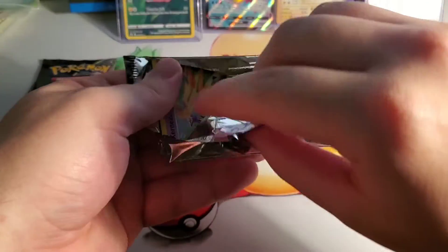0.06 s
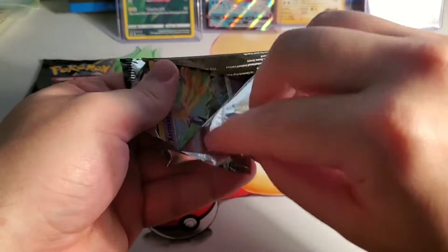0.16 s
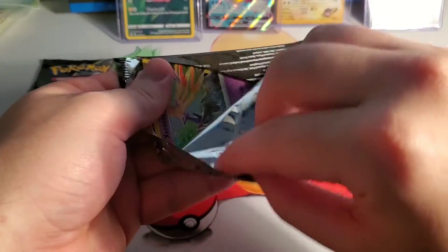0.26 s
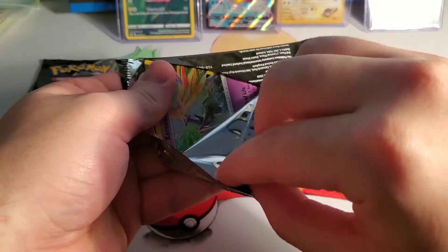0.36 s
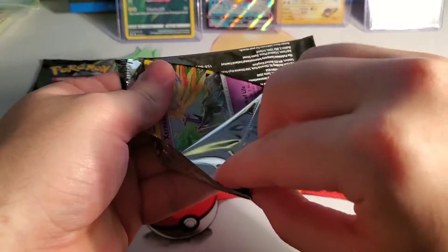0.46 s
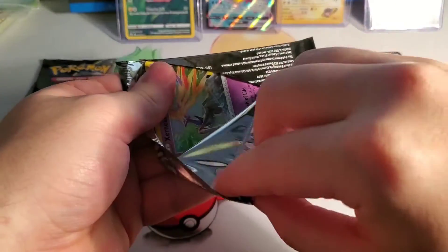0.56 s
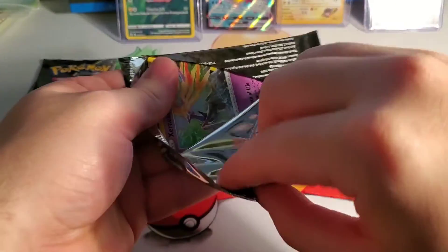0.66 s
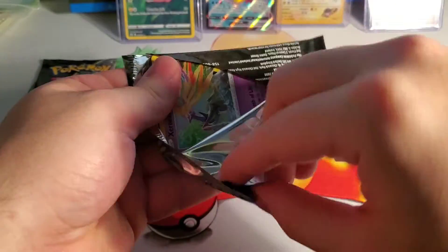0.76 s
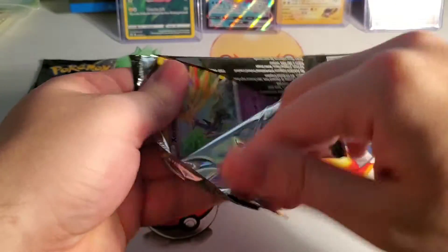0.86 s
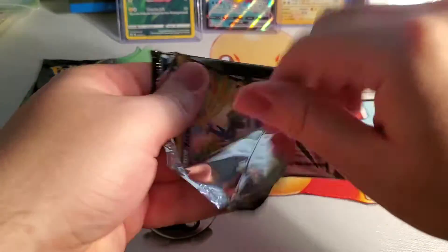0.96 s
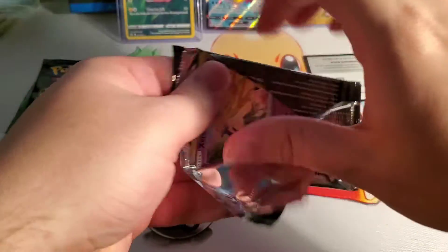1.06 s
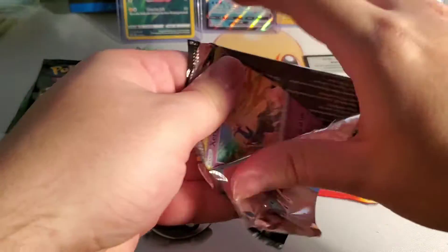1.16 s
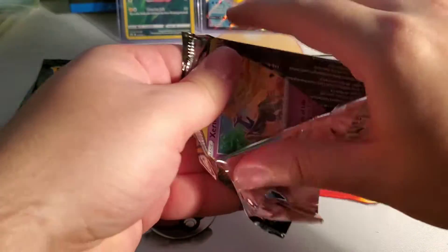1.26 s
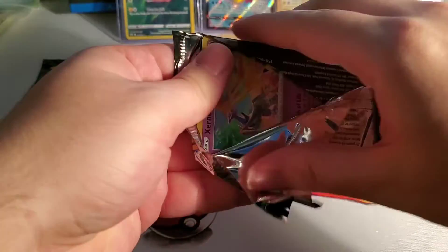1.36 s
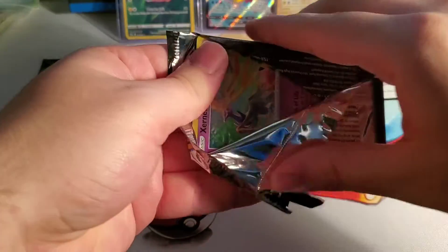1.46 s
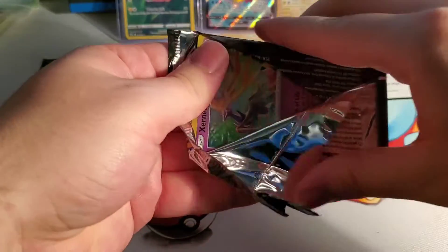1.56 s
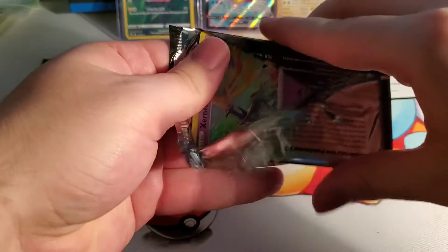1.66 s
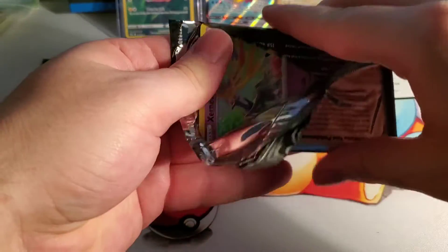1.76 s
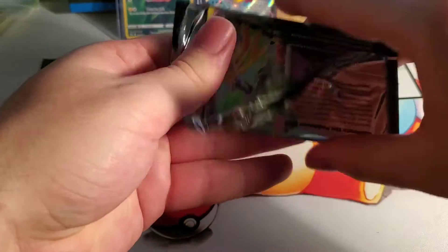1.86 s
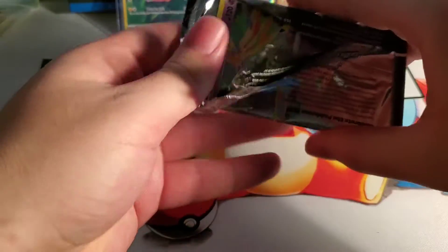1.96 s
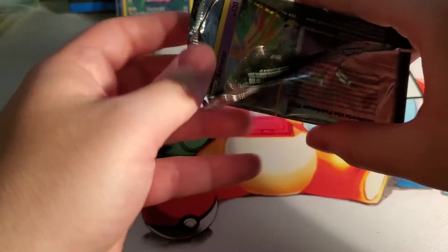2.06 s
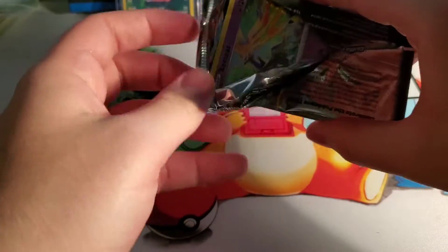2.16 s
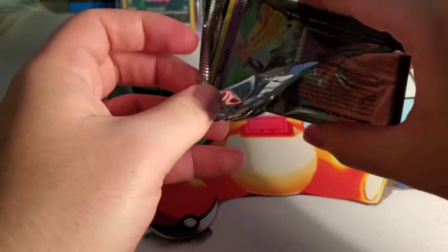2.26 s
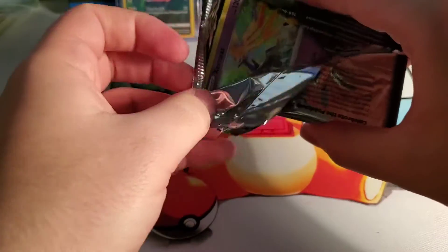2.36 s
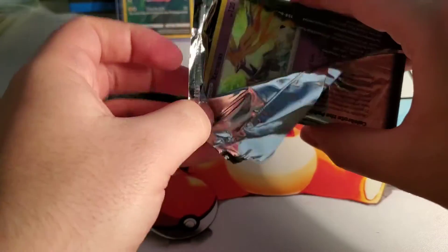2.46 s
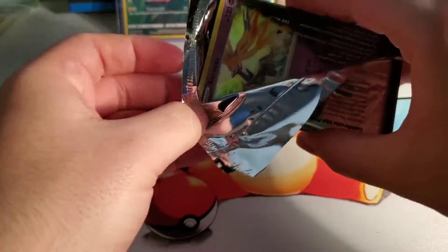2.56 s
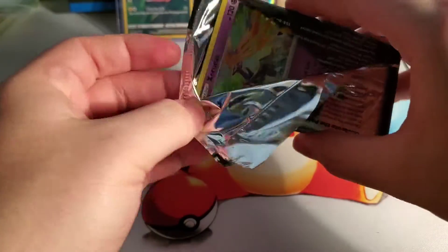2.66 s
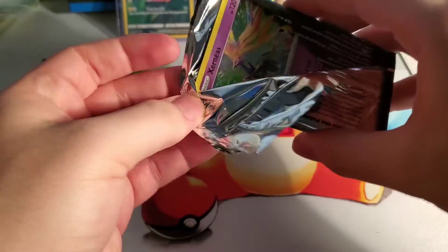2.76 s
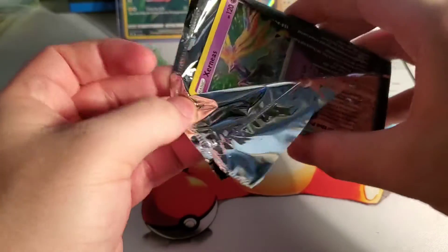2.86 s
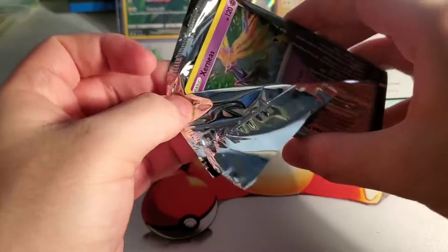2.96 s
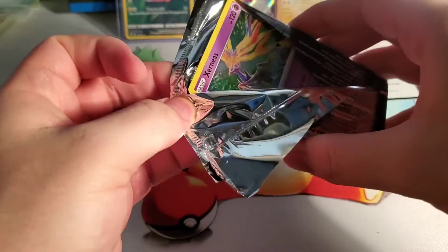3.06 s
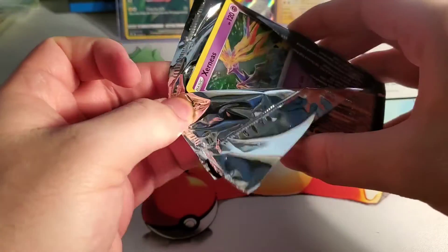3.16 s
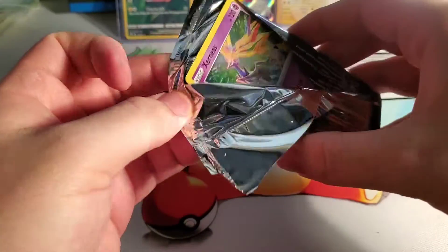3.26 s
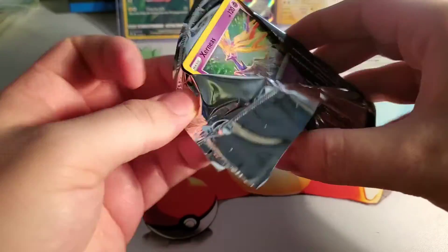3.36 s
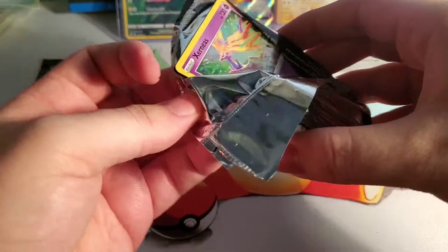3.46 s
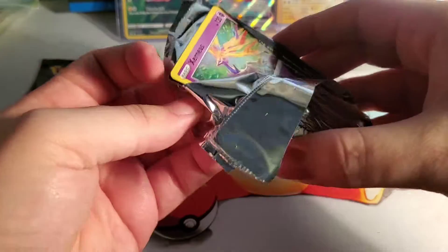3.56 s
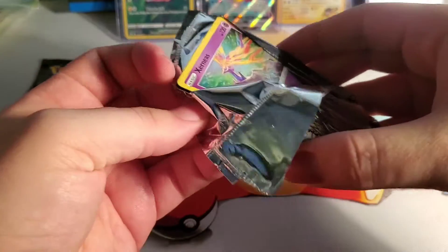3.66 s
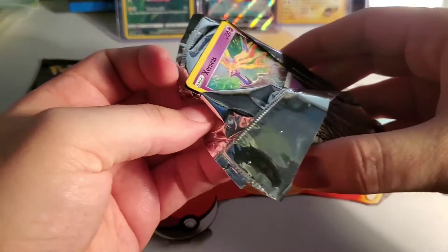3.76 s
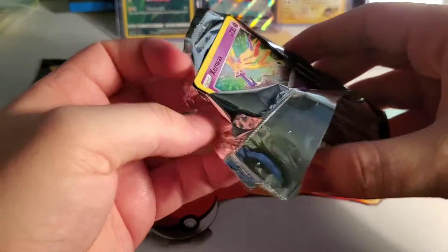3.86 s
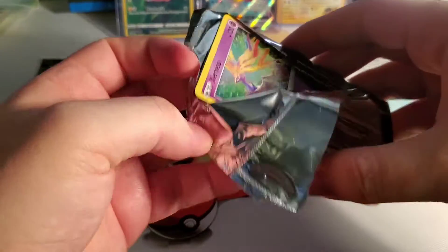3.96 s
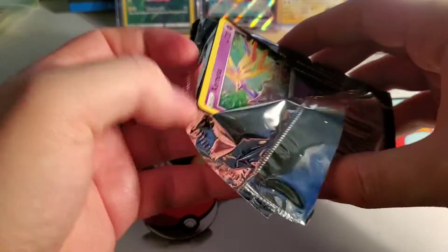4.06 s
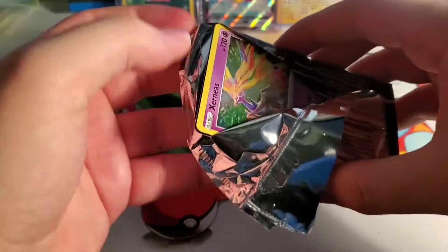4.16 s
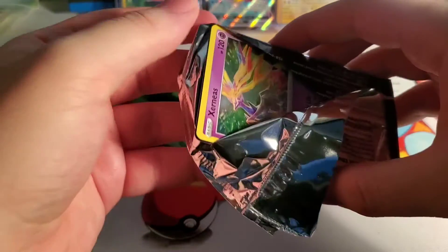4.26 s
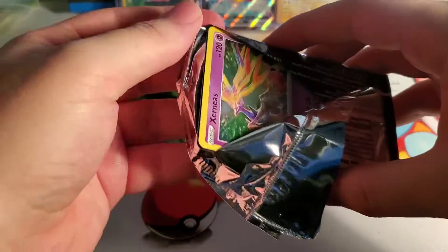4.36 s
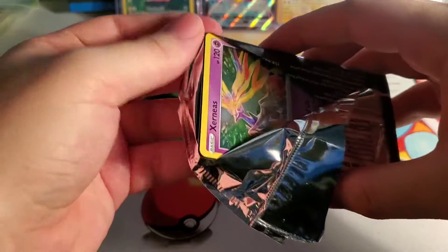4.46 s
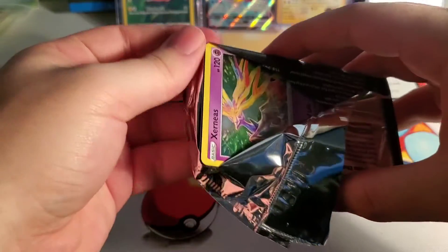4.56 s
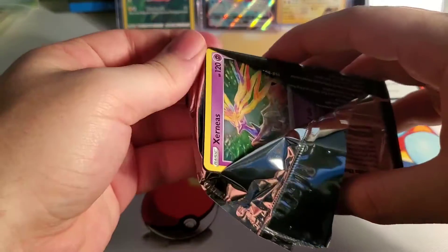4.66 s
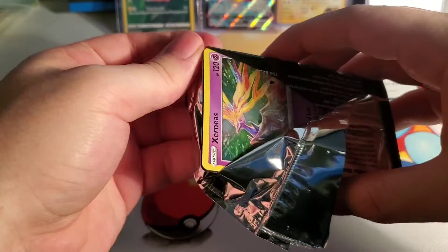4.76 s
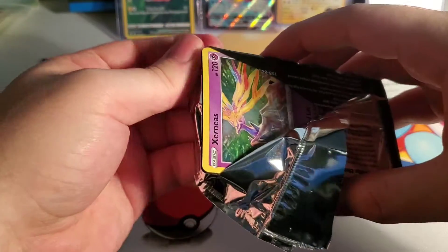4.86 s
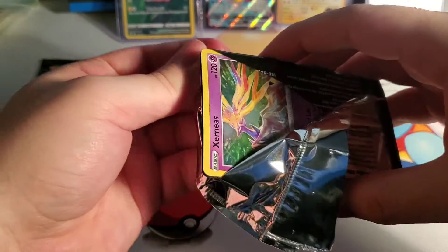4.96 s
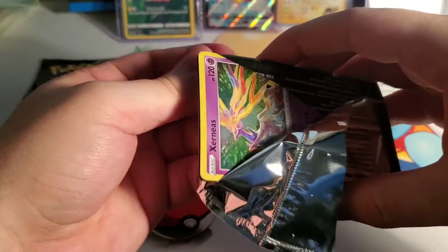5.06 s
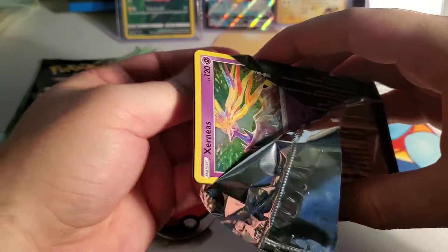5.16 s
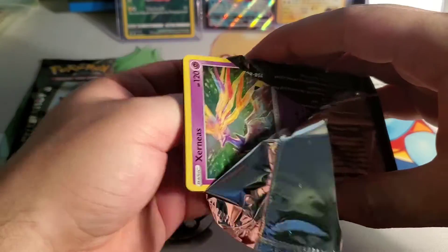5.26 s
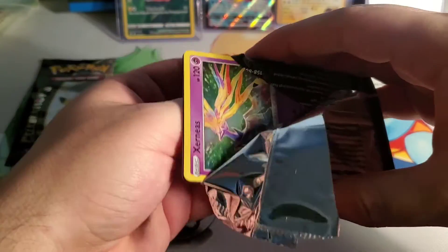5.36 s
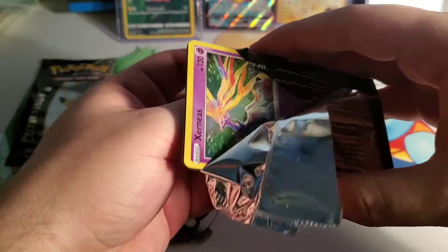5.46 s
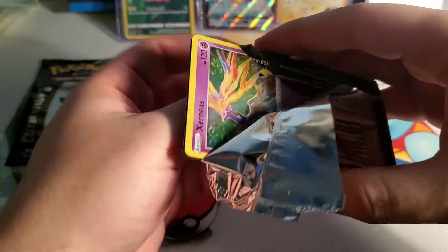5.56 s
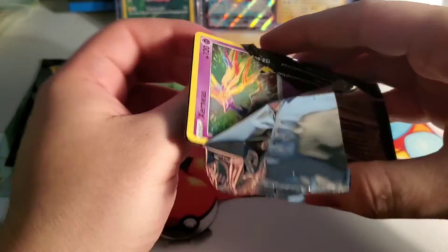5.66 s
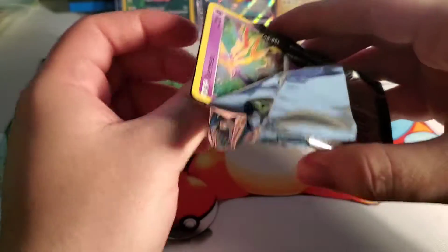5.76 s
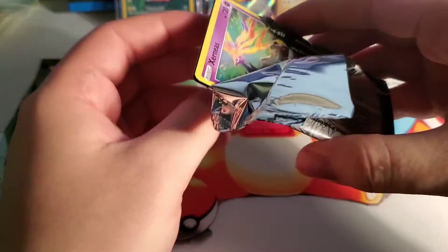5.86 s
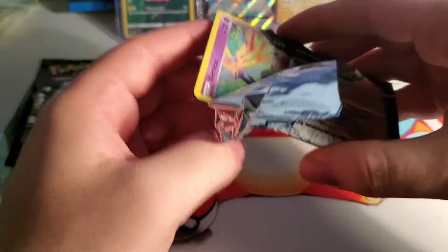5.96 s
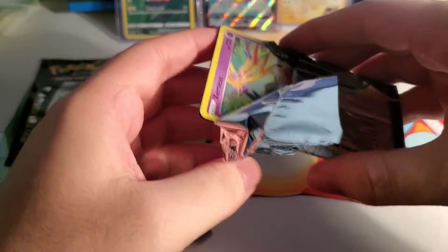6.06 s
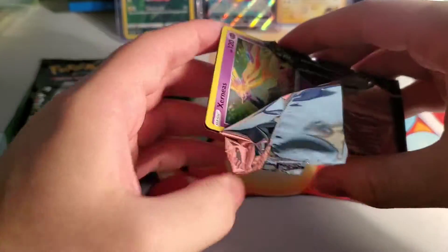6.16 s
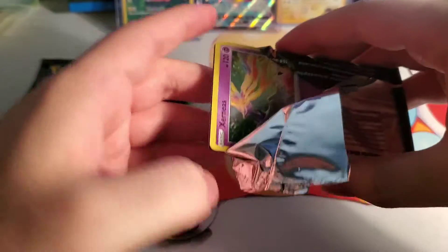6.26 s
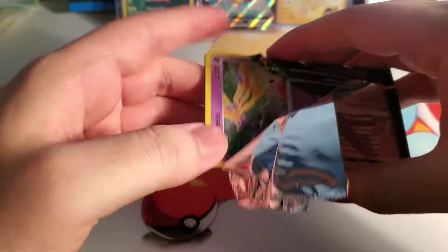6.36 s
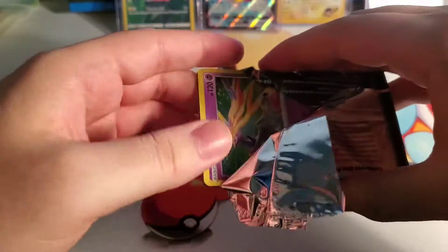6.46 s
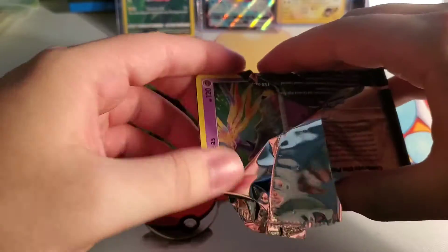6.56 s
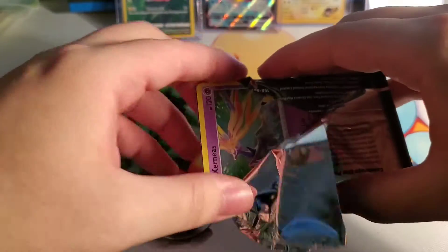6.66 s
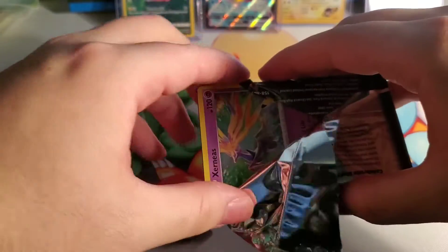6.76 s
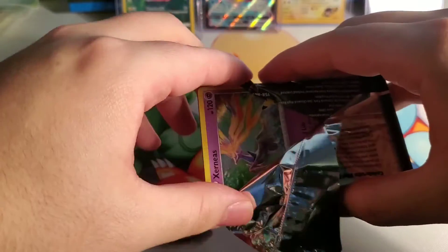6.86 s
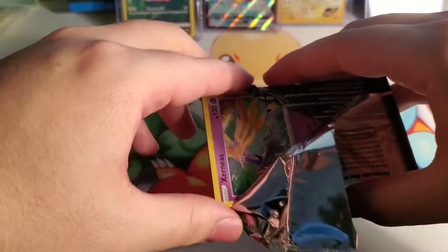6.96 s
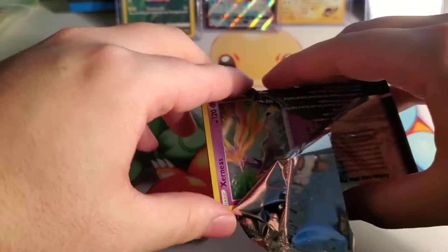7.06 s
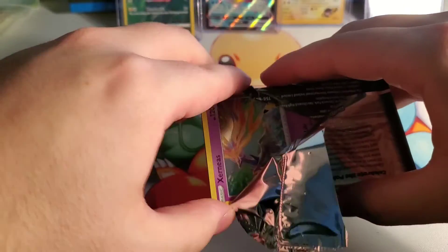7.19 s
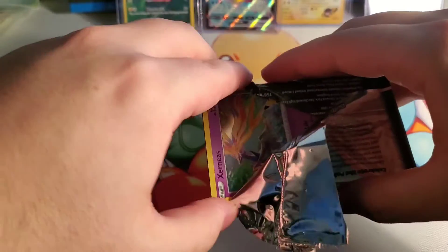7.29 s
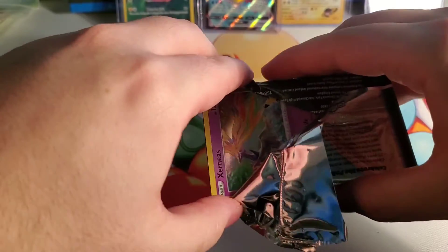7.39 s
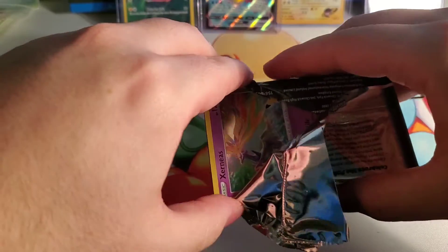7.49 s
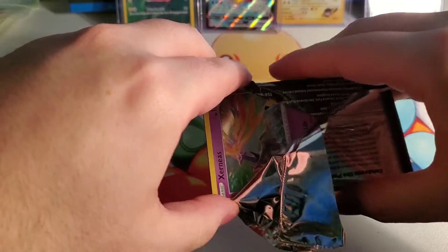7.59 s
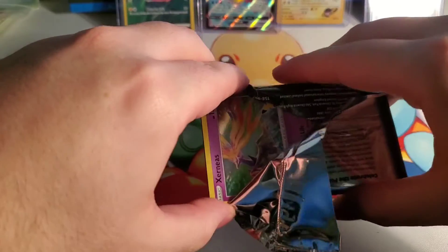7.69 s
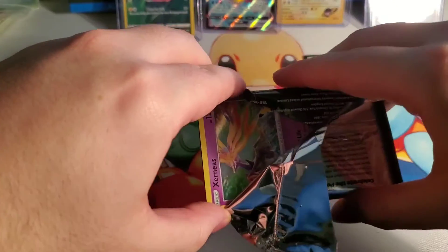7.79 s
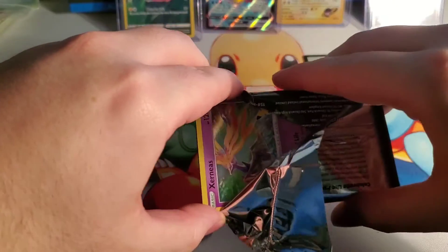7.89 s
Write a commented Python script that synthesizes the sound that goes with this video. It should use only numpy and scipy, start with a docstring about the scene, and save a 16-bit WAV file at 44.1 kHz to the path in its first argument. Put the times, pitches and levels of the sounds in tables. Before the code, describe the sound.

Close, crisp snaps and rustles of a foil wrapper being pulled open in uneven bursts, with one brief finger squeak, in a quiet room.

```python
"""Foil wrapper, torn open and crumpled

Two hands work a small wrapper just under a two-port microphone in a quiet room.
Creases snap one by one and broad panels pop over the rustle of each stroke.
Once a finger sticks and slips along the film with a squeak; later, glued seams peel.
A wavering hum and a low rumble fill the room."""
import sys
import numpy as np
from scipy import signal
from scipy.fft import rfft, irfft
from scipy.io import wavfile
from scipy.ndimage import uniform_filter1d

SR = 44100
rng = np.random.default_rng(int(sys.argv[2]) if len(sys.argv) > 2 else 0)


def to_wav(sig):
    """Store sig (one row per channel, or 1-D mono) as 16-bit WAV at the path in sys.argv[1].

    Samples outside -1..1 are clipped; the rate is SR.
    """
    pcm = np.clip(np.atleast_2d(sig), -1, 1) * 32767
    pcm = np.round(pcm).astype(np.int16)
    wavfile.write(sys.argv[1], SR, pcm.T)  # frames by channels


N = 349713
FRAME = 256  # samples per short-time spectrum


def amp(db):
    """Decibels to gain."""
    return 10 ** (np.asarray(db) / 20)


def unit(x):
    """Scales to rms 1."""
    return x / np.sqrt(np.mean(x ** 2) + 1e-20)


def on_log(points, hz):
    """Reads a (frequency, value) curve on a log axis."""
    f, value = np.transpose(points)
    return np.interp(np.log(hz + 1), np.log(f + 1), value)


def band(x, lo_hz, hi_hz):
    """Causal band-pass."""
    return signal.sosfilt(signal.butter(2, [lo_hz, hi_hz], "band", fs=SR, output="sos"), x)


def jitter(count, span):
    """Noise smoothed over `span` samples."""
    return uniform_filter1d(rng.standard_normal(count), size=span)


def ports(x, other, share, lag):
    """The right port hears the source `lag` samples late, with a share of `other` from its own path."""
    right = np.sqrt(1 - share ** 2) * x + share * other
    return np.array([x, np.roll(right, lag, axis=-1)])


def patchy(x, depth_db=3.5):
    """Adds grit: random drifting patches of the spectrum rise and fall."""
    spectra = signal.stft(x, nperseg=FRAME)[2]
    patches = uniform_filter1d(rng.standard_normal(spectra.shape[1:]), size=5, axis=0)
    drift = unit(uniform_filter1d(patches, size=14, axis=1))
    return signal.istft(spectra * amp(depth_db * drift), nperseg=FRAME)[1][:, :N]


def room_tone(air_db=-63.5, hum_db=-61.5, hum_hz=57.96, half_width_hz=2):
    """Rumble and hiss, partly shared by the ports, and a wavering hum of narrow-band noise."""
    # colour of the room's air: f/Hz, relative level/dB
    air_colour = [(30, -20), (60, -4.5), (150, -8.5), (400, -31), (900, -46), (3000, -42.5), (16000, -44)]
    hz = np.fft.rfftfreq(N, 1 / SR)
    left, other = rfft(rng.standard_normal((2, N)))
    apart = on_log([(60, 0.84), (300, 0.21), (2000, 0.77)], hz)
    right = np.sqrt(1 - apart ** 2) * left + apart * other
    wash = irfft(np.array([left, right]) * amp(on_log(air_colour, hz)), N)
    hum = irfft(rfft(rng.standard_normal(N)) / (1 + ((hz - hum_hz) / half_width_hz) ** 2), N)
    return amp(air_db) * unit(wash) + amp(hum_db) * unit(hum)


def rustle(knead_crackle=.76, slide_crackle=.33, crackles_per_s=250):
    """Each stroke swells and fades: smooth hiss of skin on film, with tiny crackles of uneven size."""
    # fingers kneading the film: t/s, length/s, level/dB, brightness/(dB per octave)
    kneads = [(0.215, 0.16, -35.5, 5.5), (0.418, 0.39, -57, 5), (0.778, 0.3, -50, 3.5),
              (1.287, 0.22, -44.5, 6), (2.417, 0.59, -52, 3.5), (2.98, 0.13, -43, 8),
              (3.377, 0.13, -33.5, 12), (3.907, 0.42, -58, 0.5), (4.572, 0.053, -53.5, 6.5),
              (5.379, .34, -60, 7), (7.33, .6, -65.5, 9.5), (5.669, 0.18, -51, 4.5),
              (5.764, 0.61, -58.5, 5.5), (6.51, 0.15, -53.5, 4)]
    # fingers sliding over the film: t/s, length/s, level/dB, brightness/(dB per octave)
    slides = [(0.0, 0.096, -51.5, 4), (0.643, 0.088, -38.5, 9), (1.488, 0.17, -34.5, 4.5),
              (1.651, 0.088, -40, 4.5), (1.756, 0.56, -49.5, 5), (3.493, 0.064, -26.5, 9.5),
              (3.596, .18, -43, 8), (6.269, 0.19, -56, 3), (6.668, 0.084, -51, 10.5),
              (6.943, 0.19, -59.5, 8), (7.214, 0.068, -63.5, 3), (5.094, 0.31, -38, 8)]
    # colour of rubbed film: f/Hz, relative level/dB
    film = [(350, -16.5), (700, -5.5), (2000, -9), (4000, -11.5), (9000, -23)]
    sizes = amp(5.5 * np.minimum(rng.exponential(1, N), 3))
    impulses = sizes * (rng.random(N) < crackles_per_s / SR)
    crackle = unit(signal.oaconvolve(impulses, np.exp(-np.arange(300) / SR / 0.003))[:N])
    flutter = unit(band(rng.standard_normal(N), 18.7, 26))
    noise, out = rng.standard_normal((2, N)), np.zeros((2, N))
    for strokes, share in ((kneads, knead_crackle), (slides, slide_crackle)):
        for start, length, db, tilt_db in strokes:
            at = slice(round(start * SR), round((start + length) * SR))
            count = at.stop - at.start
            grain = (1 - share + share * crackle[at]) * amp(5 * share * flutter[at])
            swell = signal.windows.tukey(count, .8) * grain
            hz = np.fft.rfftfreq(count, 1 / SR)
            colour = amp(on_log(film, hz) + tilt_db * np.log2(np.clip(hz, 500, 16000) / 4000))
            out[:, at] += amp(db) * irfft(rfft(noise[:, at] * swell) * unit(colour), count)
    return ports(*patchy(out), share=0.88, lag=5)


def panel_pops(roughness=.6, decay_cycles=2.16):
    """A panel flips and rings hollow for a few cycles, with a weaker overtone of uneven pitch."""
    # broad panels flipping: t/s, level/dB, f/Hz
    pops = [(0.083, -40, 890), (0.245, -36.5, 1120), (0.289, -31.5, 775), (0.324, -33, 1140),
            (0.619, -42, 960), (0.874, -38, 744), (1.393, -37.5, 795), (2.501, -30.5, 846),
            (2.527, -18.5, 948), (2.578, -37, 1250), (2.707, -30.5, 1355), (2.728, -29, 748),
            (3.017, -37, 1310), (3.512, -34, 830), (4.165, -39.5, 615), (4.761, -24.5, 710),
            (5.301, -29, 950), (5.72, -33.5, 628), (5.794, -41.5, 523), (6.605, -43, 762),
            (6.823, -38, 1350)]
    out, t = np.zeros(N), np.arange(1024) / SR
    for start, db, hz in pops:
        ring = np.sin(2 * np.pi * hz * t) + .5 * np.sin(2 * np.pi * hz * rng.uniform(1.4, 2.1) * t)
        papery = 1 + roughness * unit(jitter(len(t), 12))
        envelope = (1 - np.exp(-t / 0.00022)) * np.exp(-t * hz / decay_cycles)
        out[round(start * SR):][:len(t)] += amp(db) * ring * papery * envelope
    thin = band(out, 400, 9000)  # a small panel radiates no bass
    return ports(thin, thin, share=0, lag=2)


def crease_snaps(ring_hz=(2800, 7000), body_db=-13, spread_db=2.5):
    """Each crease buckles at its own spot, rings briefly at its own pitch, then sheds smaller ticks."""
    # creases buckling: t/s, crack level/dB, sizzle above the crack/dB
    snaps = [(0.084, -15.5, 2), (0.101, -12.5, 4.5), (0.19, -30, 1), (0.2119, -26, -0.5),
             (0.245, -34.5, 17), (0.2883, -14, 3.5), (0.416, -31, -0.5), (0.5436, -27, 6),
             (0.8373, -25, 0.5), (0.868, -19, 0.5), (0.9671, -15.5, -1.5), (1.001, -23, 3),
             (1.0105, -21, -1), (1.118, -18, 3.5), (1.1743, -13.5, 2), (1.1975, -23.5, -36),
             (1.2596, -30, -2), (1.4045, -20, 7.5), (1.4404, -18.5, 6), (1.6994, -12.5, 1),
             (1.763, -35.5, -13), (2.263, -36.5, -5), (2.3828, -29.5, -3.5), (2.4773, -25, 6.5),
             (2.527, -10.5, 0.5), (2.6636, -43, 2), (2.7262, -19.5, 7), (2.8391, -18.5, 4),
             (2.912, -33, -3), (3.3706, -27, 9), (3.397, -16, 2.5), (3.4047, -13.5, 2),
             (3.4353, -13.5, 5.5), (3.528, -19, -25), (3.541, -16.5, 6.5), (3.6079, -22, 3.5),
             (3.813, -46.5, 5.5), (3.917, -42.5, 19), (3.934, -30.5, 3), (3.946, -19.5, -2),
             (3.9724, -34, 4), (4.0193, -48.5, 18.5), (4.066, -39.5, 12), (4.0921, -35.5, 5.5),
             (4.1649, -32, 1), (4.554, -40.5, 14), (4.7359, -30, 1), (4.7545, -19, 7), (4.851, -20.5, 1.5),
             (4.873, -28.5, 13), (4.883, -25, 2), (4.9014, -30.5, 12), (4.9352, -28, 12.5),
             (4.9743, -29, 11), (5.0263, -29, 11.5), (5.121, -30, 9), (5.1528, -23, 15),
             (5.1702, -27.5, 15), (5.18, -30, 14), (5.1844, -31, 14.5), (5.1925, -27.5, 12.5),
             (5.223, -30, 14), (5.246, -34, 14.5), (5.2602, -12.5, 3.5), (5.3001, -21, 11),
             (5.31, -19.5, -7), (5.416, -39.5, 6.5), (5.7191, -25.5, 9), (5.9463, -31, -1.5),
             (6.0418, -33.5, -3), (6.157, -38.5, -2), (6.396, -22, -2.5), (6.594, -29, -5.5),
             (6.8245, -30, -4), (6.8617, -30.5, 3.5), (7.0013, -38, 4.5), (7.393, -36.5, 5)]
    out, t = np.zeros((2, N)), np.arange(1536) / SR
    attack = 1 - np.exp(-t / 0.00061)
    for start, crack_db, sizzle_db in snaps:
        noise = rng.standard_normal((2, len(t)))
        side, lag, pitch = rng.uniform(-1.1, 1, 3)
        ring = signal.iirpeak(np.interp(pitch, (-1, 1), ring_hz), Q=2.5, fs=SR)
        noise += .7 * signal.lfilter(*ring, noise)
        ticks = .4 * np.repeat(rng.random(32) ** 4, 48) * np.exp(-t / 0.01)
        small = np.clip((sizzle_db + 2.5) / 12, 0, 1)  # small creases: more sizzle, less body
        body = (body_db - 6.5 * small, 700, 2000, .002, .25)
        crack = (0, 2000 + 2200 * small, 8000, .0015, .7)
        sizzle = (sizzle_db, 7200, 15000, .0011, .8)
        burst = 0
        for db, lo_hz, hi_hz, decay_s, share in (body, crack, sizzle):
            layer = band(noise * attack * (np.exp(-t / decay_s) + ticks), lo_hz, hi_hz)
            layer /= abs(layer[0]).max()
            burst += amp(crack_db + db) * ports(*layer, share, lag=round(5 + 3 * lag))
        pan_db = spread_db * side
        out[:, round(start * SR):][:, :len(t)] += burst * amp([[pan_db / 2], [-pan_db / 2]])
    return out


def finger_squeak(throb_hz=95, rasp=.2, catch_hz=818, catch_db=-34.5, catch_s=0.013):
    """A finger catches with a low chirp, then squeals: throbbing at first, brighter as the pitch sags."""
    # stick-slip on the film: t/s, f/Hz, level/dB, throb depth
    gesture = [(1.517, 1277, -34, 1.3), (1.55, 1304, -28, 1.9), (1.59, 1160, -31.5, 0.41),
               (1.621, 1062, -39, 0.033), (1.645, 1130, -87, 0.2)]
    # partials of the squeal: multiple of the pitch, relative level/dB
    partials = [(.5, -17), (1, -0.5), (2, -2.5), (3, 0), (4, -2.5), (5, -4.5)]
    times, *curves = np.transpose(gesture)
    t = np.arange(round(times[0] * SR), round(times[-1] * SR)) / SR
    hz, db, depth = (np.interp(t, times, curve) for curve in curves)
    cycles = np.cumsum(hz * (1 + 0.26 * jitter(len(t), 50))) / SR
    tone = 0
    for order, partial_db in partials:
        rough = 1 + rasp * (order != 1) * (unit(jitter(len(t), 200)) - 1)
        dulling_db = 8 * depth * (order > 1)
        tone += amp(partial_db - dulling_db) * np.sin(2 * np.pi * order * cycles) * rough
    catch = amp(catch_db) * np.sin(2 * np.pi * catch_hz * t) * np.exp(-(t - t[0]) / catch_s)
    throb = np.exp(0.86 * depth * (np.cos(2 * np.pi * throb_hz * (t - 1.5505)) - .6))
    squeal = (tone * throb * amp(db) + catch) * signal.windows.tukey(len(t), .1)
    out = np.zeros(N)
    out[round(times[0] * SR):][:len(t)] = squeal
    return ports(out, out, share=0, lag=1) * amp([[1.5], [-1.5]])


def hand_hollow(start_s=1.93, length_s=.28, db=-53.5, glide_hz=(3240, 920), width_hz=1300):
    """The slowest slide hisses through the hollow of the hand, whose pitch sinks as the hand closes."""
    count, out = round(length_s * SR), np.zeros((2, N))
    carrier = np.exp(2j * np.pi * np.cumsum(np.linspace(*glide_hz, count)) / SR)
    pole = np.exp(-np.pi * width_hz / SR)
    noise = rng.standard_normal((2, count))
    hiss = (carrier * signal.lfilter([1 - pole], [1, -pole], noise / carrier)).real
    out[:, round(start_s * SR):][:, :count] = amp(db) * unit(hiss) * signal.windows.tukey(count, .6)
    return ports(*out, share=0.49, lag=3)


def seam_peels(slip_hz=(3200, 7000), decay_s=.0011, spread_db=1.5):
    """Glue lets go in a slowing train of slips, each a bright puff, a little uneven in time and size."""
    # glued seams peeling: t/s, length/s, level/dB, first slip rate/Hz, last slip rate/Hz
    peels = [(3.622, 0.059, -46.5, 480, 140), (3.688, 0.059, -47, 330, 86)]
    out = np.zeros((2, N))
    for start, length, db, first, last in peels:
        count = round(length * SR)
        rate = np.geomspace(first, last, count) * (1 + 0.044 * unit(jitter(count, 300)))
        slips = np.diff(np.floor(np.cumsum(rate) / SR), prepend=0)
        slips *= amp(spread_db * rng.standard_normal(count)) * signal.windows.tukey(count, .3)
        puff = rng.standard_normal((2, 256)) * np.exp(-np.arange(256) / (decay_s * SR))
        puffs = signal.fftconvolve(slips[None], puff, axes=1)[:, :count]
        rip = band(band(puffs, *slip_hz), *slip_hz) + 0.27 * band(puffs, 10000, 17000)
        out[:, round(start * SR):][:, :count] += amp(db) * unit(rip)
    return ports(*out, share=1, lag=4)


def room_tail(x):
    """Diffuse tail: noise, separate at each port, follows the sound's colour; the treble dies first."""
    # reverberation between the walls: f/Hz, t60/s
    walls = [(600, 0.3), (15000, 0.14)]
    hz, t, spectra = signal.stft(x.mean(0), SR, nperseg=FRAME, noverlap=192)
    feedback = amp(-120 * t[1] / on_log(walls, hz))  # share of power left after each hop
    power = uniform_filter1d(abs(spectra) ** 2, size=5, axis=0)
    late = [signal.lfilter([0, 0, 0, 1 - r], [1, -r], row) for r, row in zip(feedback, power)]
    real, imag = rng.standard_normal((2, 2, *spectra.shape))
    tail = np.sqrt(np.abs(late)) * (real + 1j * imag)
    return signal.istft(tail, SR, nperseg=FRAME, noverlap=192)[1][:, :N]


def scene(crisp_send_db=-4.5, pitched_send_db=-14.5):
    """The close wrapper over room tone; its crisp sounds feed the tail more than its pitched ones."""
    crisp = crease_snaps() + rustle() + seam_peels() + hand_hollow()
    pitched = panel_pops() + finger_squeak()
    send = amp(crisp_send_db) * crisp + amp(pitched_send_db) * pitched
    return crisp + pitched + patchy(room_tail(send)) + room_tone()


def record(dry, edge_hz=16950):
    """Lifts the mids and presence and cuts off the top above 16 kHz."""
    # overall tone colour: f/Hz, gain/dB
    tone_curve = [(300, 0), (600, 4), (3500, 7), (6800, 8), (7300, 0), (15700, 1), (16000, -16)]
    hz = np.linspace(0, SR / 2, 257)
    # minimum_phase takes the square root of the response, so the curve goes in squared
    colour = signal.minimum_phase(signal.firwin2(511, hz, amp(2 * on_log(tone_curve, hz)), fs=SR))
    coloured = signal.oaconvolve(dry, colour[None])[:, :N]
    low_pass = signal.firwin(511, edge_hz, window=("kaiser", 9), fs=SR)
    return signal.oaconvolve(coloured, low_pass[None], "same")


dry = scene()
out = record(dry)
to_wav(out)
```